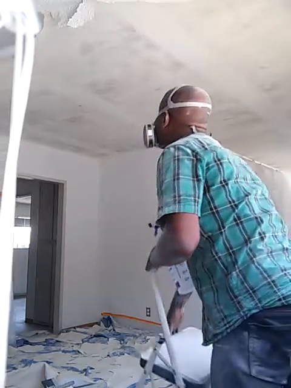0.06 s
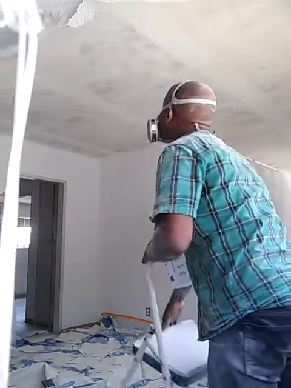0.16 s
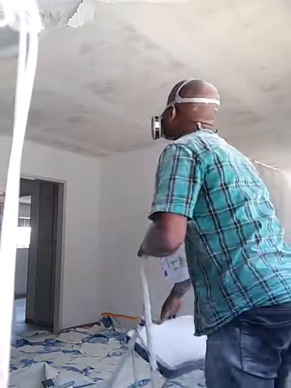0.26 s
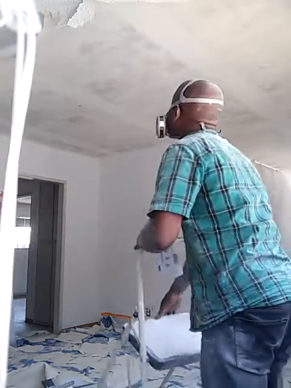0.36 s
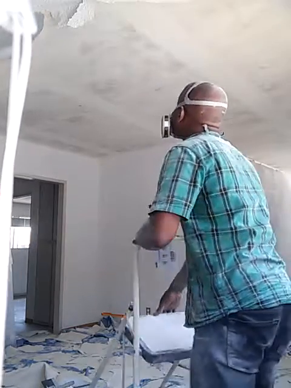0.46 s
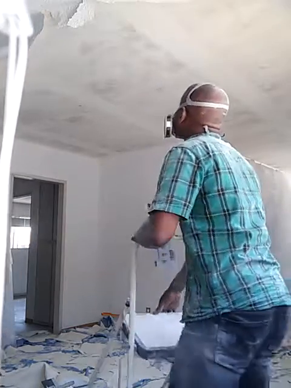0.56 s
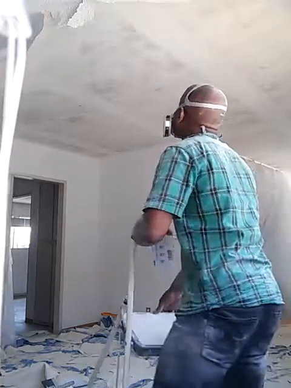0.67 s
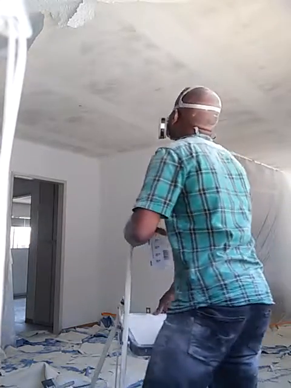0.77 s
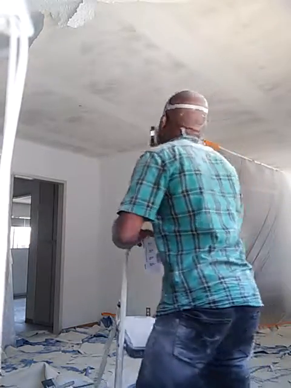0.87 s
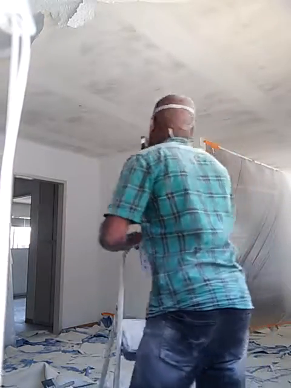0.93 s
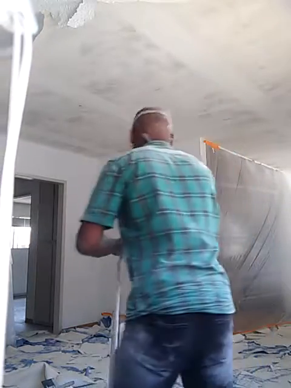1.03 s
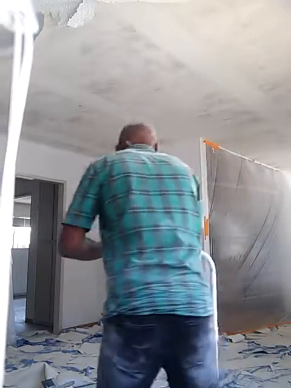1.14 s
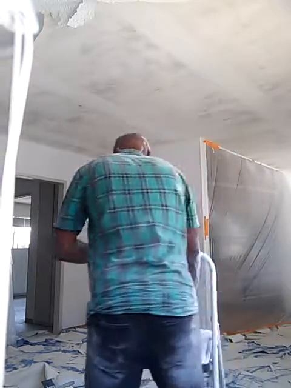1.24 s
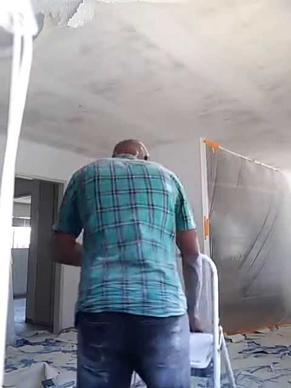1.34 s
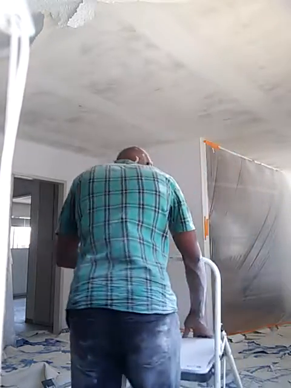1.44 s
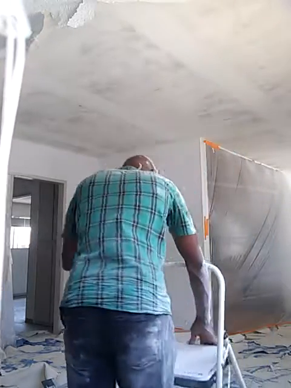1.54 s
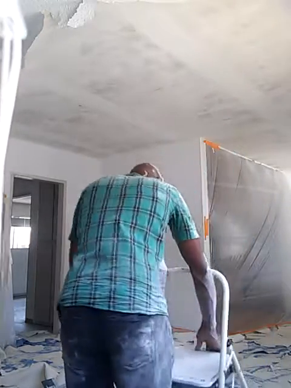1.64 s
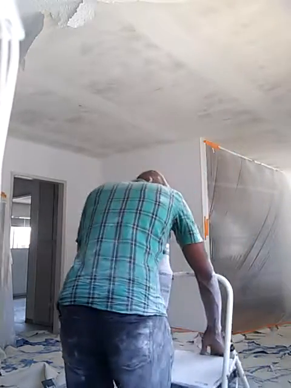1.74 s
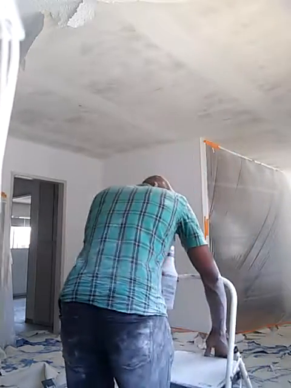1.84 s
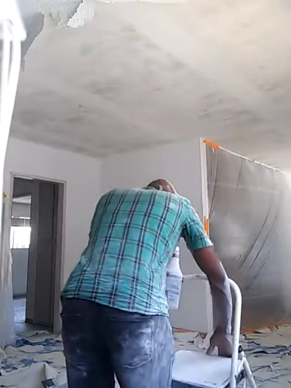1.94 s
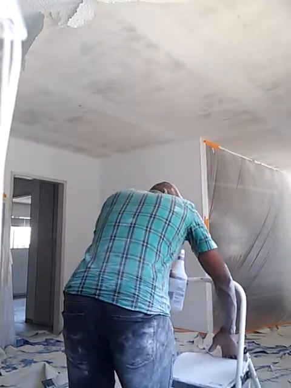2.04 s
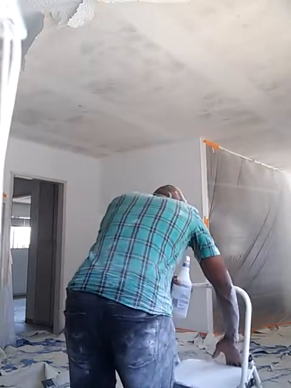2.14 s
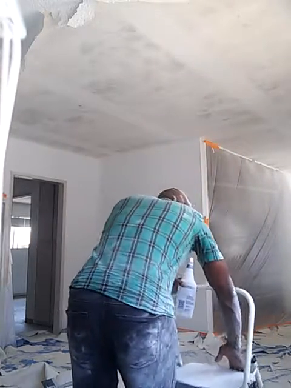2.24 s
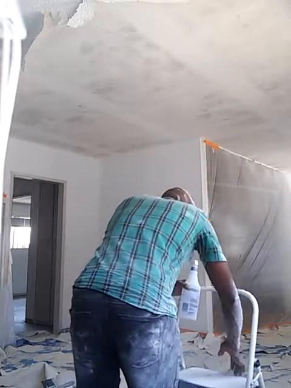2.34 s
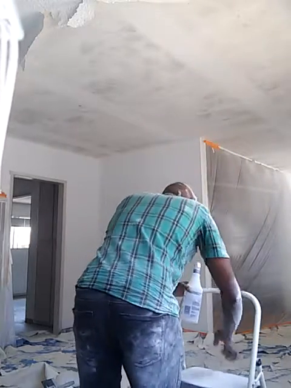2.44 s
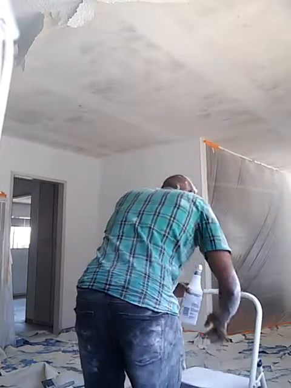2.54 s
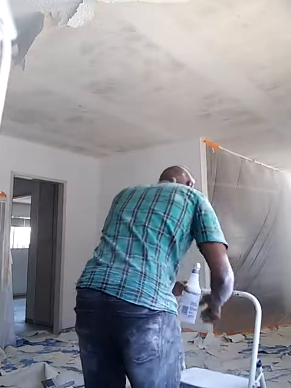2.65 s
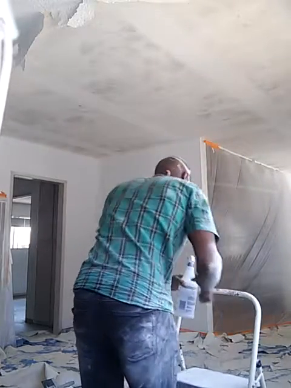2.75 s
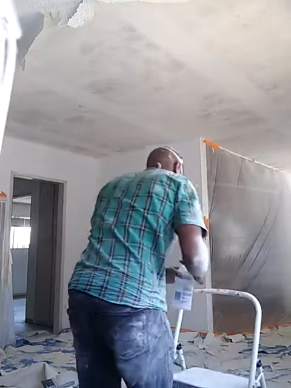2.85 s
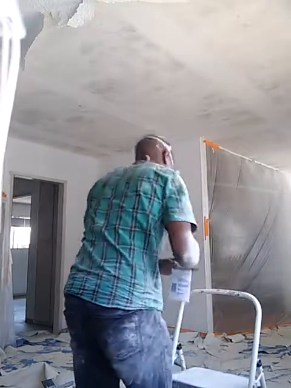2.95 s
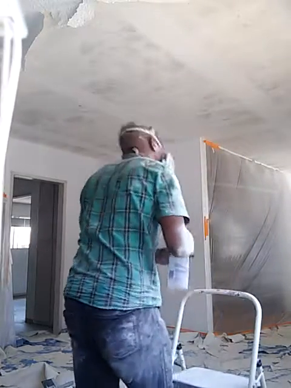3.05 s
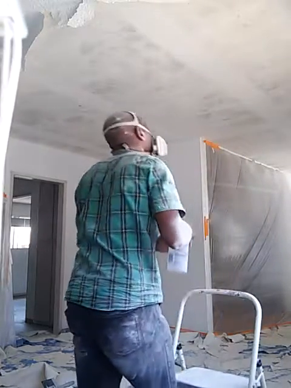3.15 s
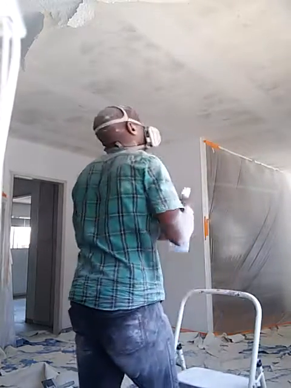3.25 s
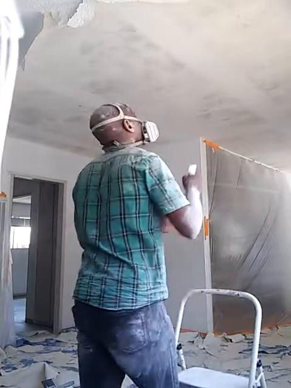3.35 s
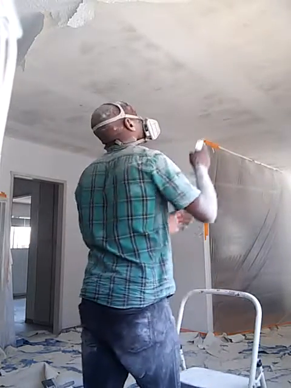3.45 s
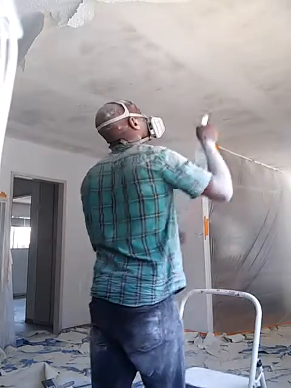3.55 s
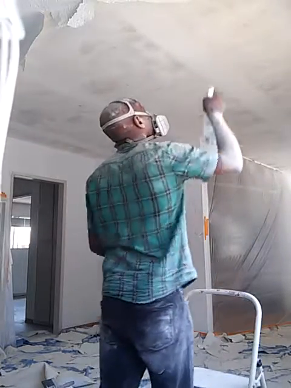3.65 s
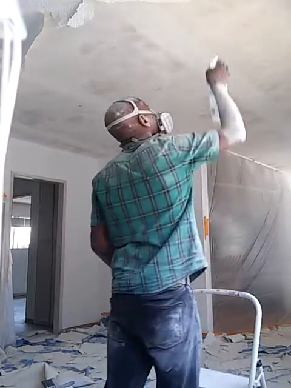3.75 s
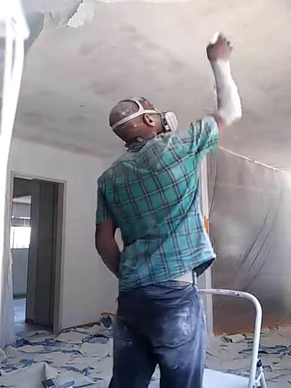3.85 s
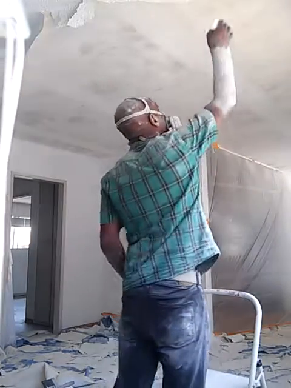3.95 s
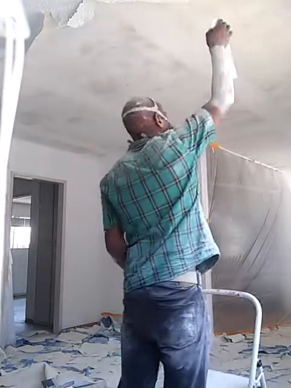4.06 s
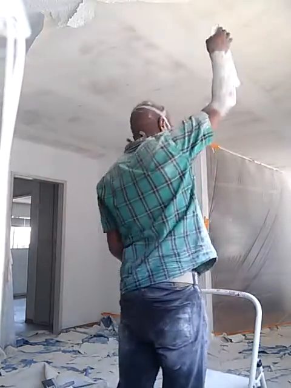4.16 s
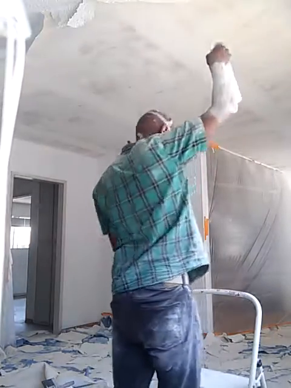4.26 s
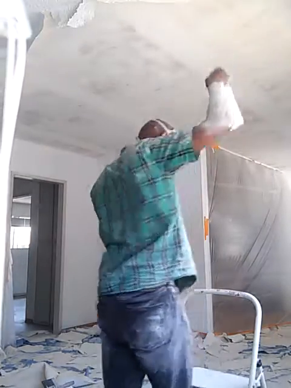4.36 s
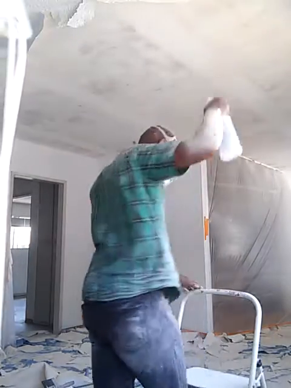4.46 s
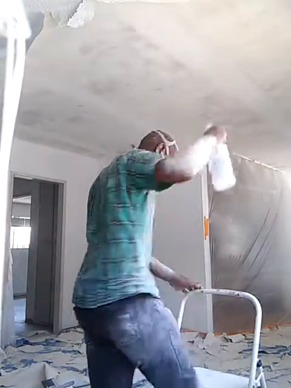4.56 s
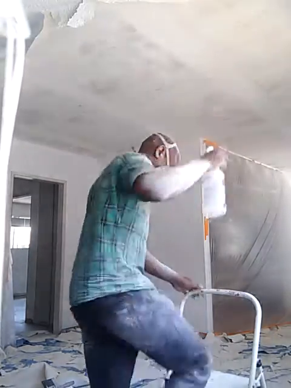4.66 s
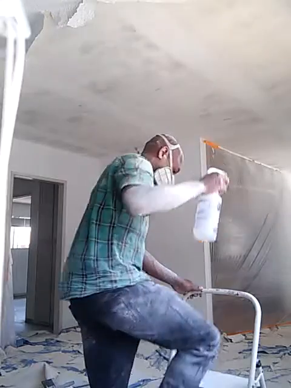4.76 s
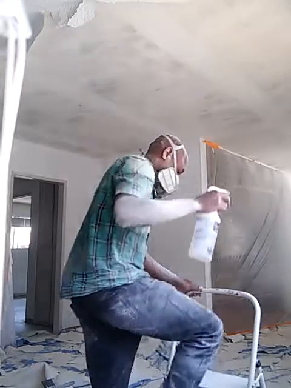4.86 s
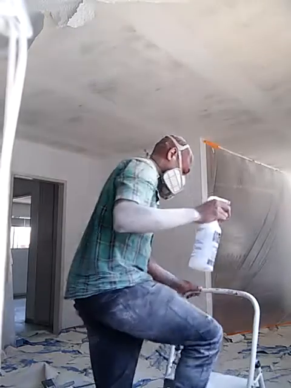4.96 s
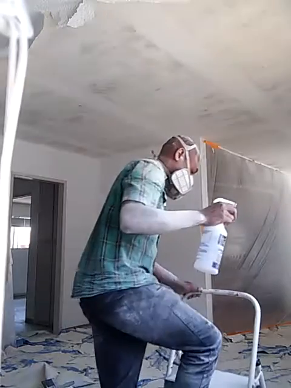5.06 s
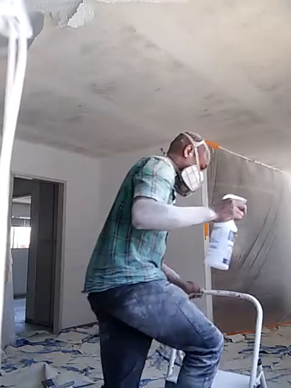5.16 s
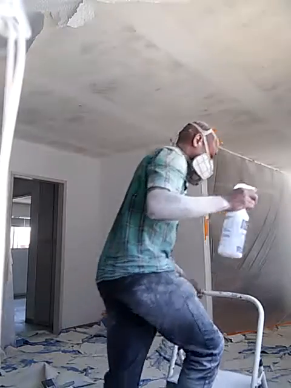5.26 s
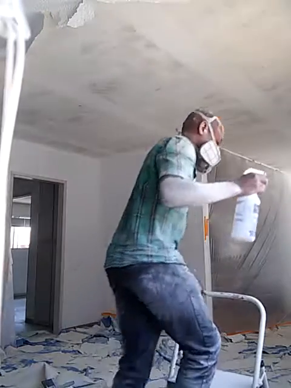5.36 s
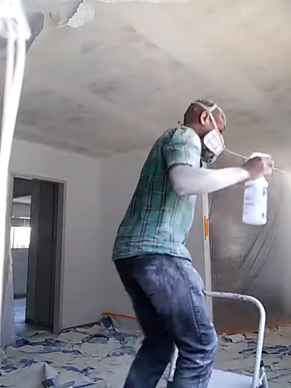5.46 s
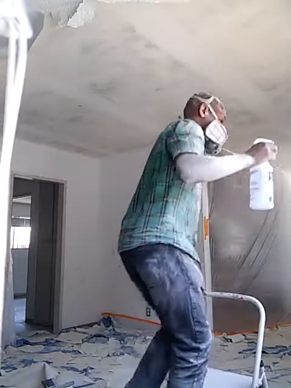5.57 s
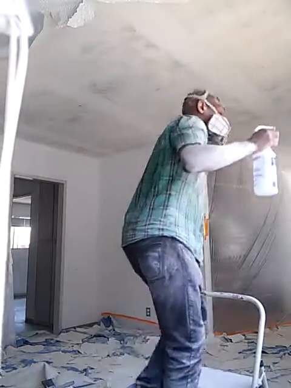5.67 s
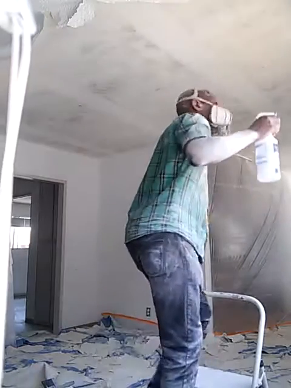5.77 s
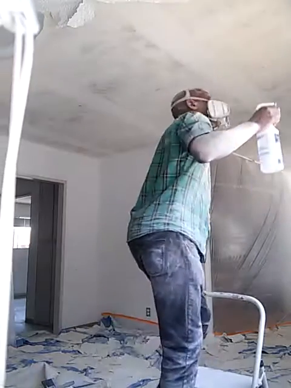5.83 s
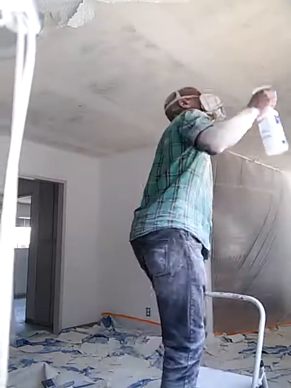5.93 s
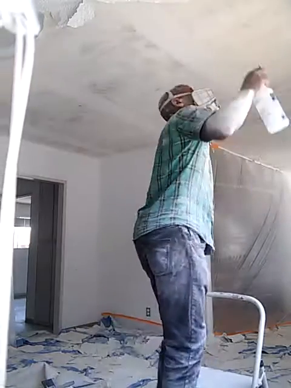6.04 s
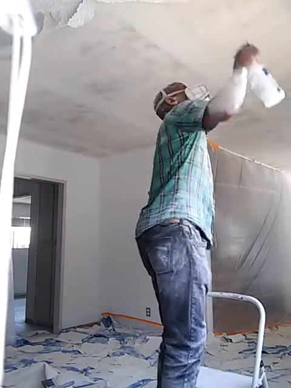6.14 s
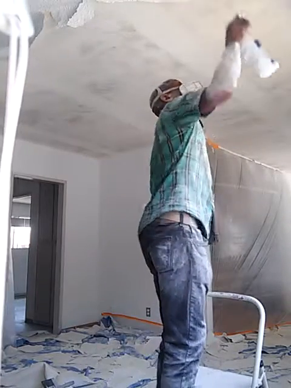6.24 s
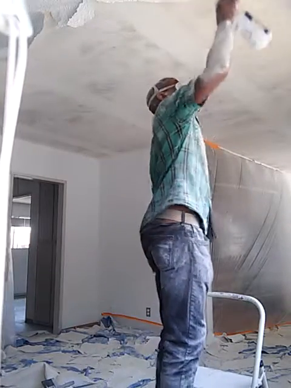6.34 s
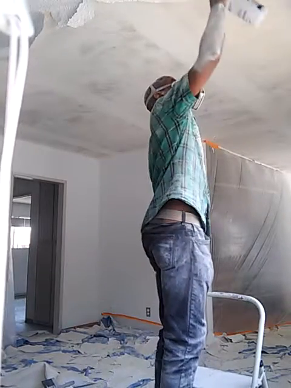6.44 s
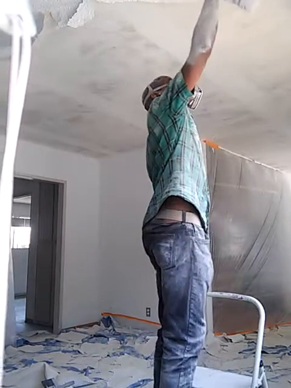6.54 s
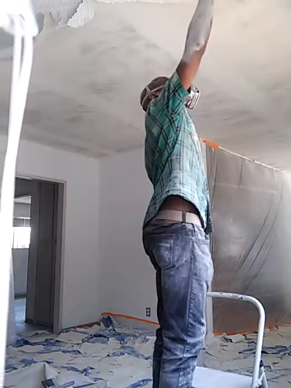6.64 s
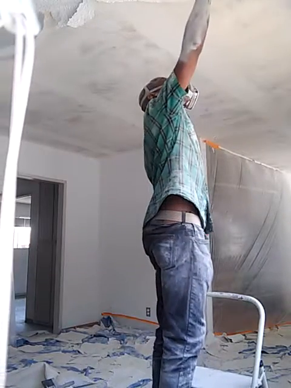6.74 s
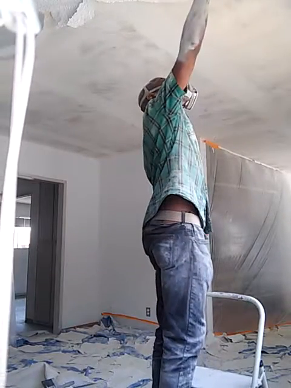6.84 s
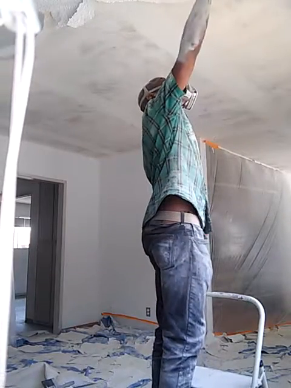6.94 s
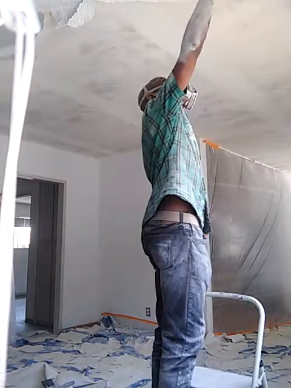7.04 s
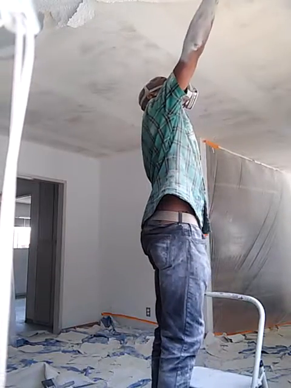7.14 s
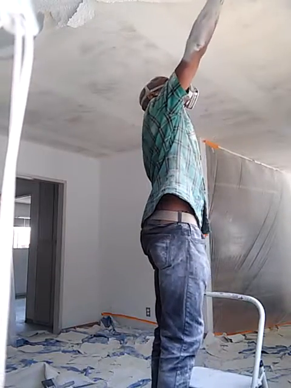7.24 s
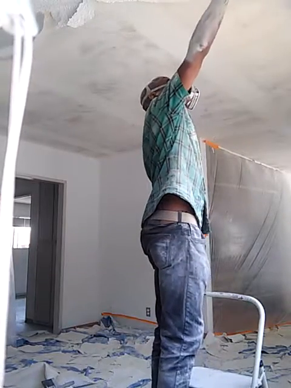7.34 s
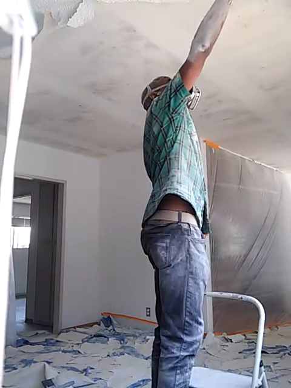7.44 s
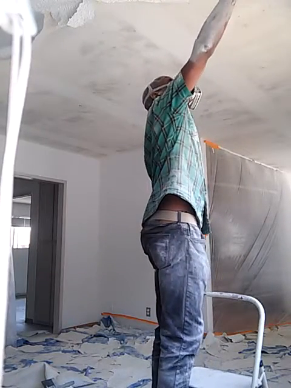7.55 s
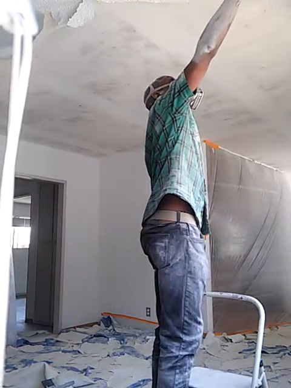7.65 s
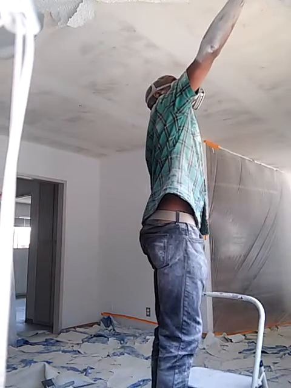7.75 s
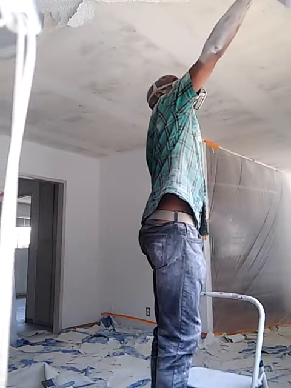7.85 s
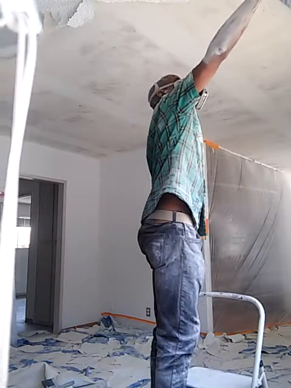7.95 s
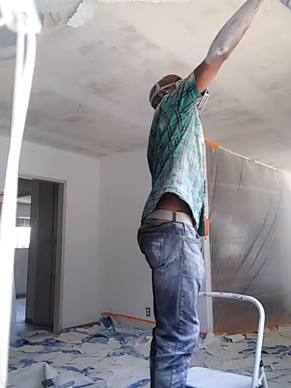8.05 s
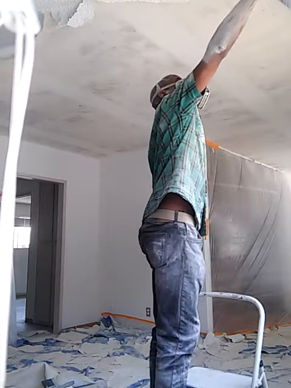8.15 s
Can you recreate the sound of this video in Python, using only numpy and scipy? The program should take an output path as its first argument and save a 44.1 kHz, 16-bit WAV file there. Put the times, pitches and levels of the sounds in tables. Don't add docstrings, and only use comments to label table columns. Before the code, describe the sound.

A bare, reverberant room with low street rumble and a distant engine drone. A metal step stool is moved with small creaks, squeaky whines and gritty shoe scuffs, then set down with a sharp double clack, loud and ringing. Plastic bottle handling and cloth rustle follow, then a foot thuds on the tread. Finally a trigger bottle is pumped overhead, clicking and hissing in short bright squirts. The microphone hears the spray fairly dry, the knocks mostly as room echo.

```python
import sys
import numpy as np
from scipy import signal
from scipy.fft import rfft, irfft
from scipy.io import wavfile

SR = 44100
rng = np.random.default_rng(int(sys.argv[2]) if len(sys.argv) > 2 else 0)


def volts(x):
    e = np.asarray(x, float) / 20
    return 10 ** e


def store_pcm(level_fs):
    pcm = np.round(np.clip(level_fs, -1, 1) * 32767).astype(np.int16)
    wavfile.write(sys.argv[1], SR, np.atleast_2d(pcm).T)


N = 361619

# (time [s], half length [s], swell [dB])
STREET_SWELLS = [(0, 0.035, 15), (0.163, .07, -10), (0.328, 0.055, 5.5), (0.855, 0.15, -9),
                 (1.22, 0.13, 10.5), (1.645, 0.11, 10.5), (1.98, 0.021, 9.5), (2.747, 0.3, 12.5),
                 (3.32, 0.16, 8), (3.753, .1, 4), (4.087, 0.12, -5.5), (4.347, 0.15, 7), (5.002, 0.27, 2),
                 (5.408, 0.16, 14.5), (5.9, 0.046, 7.5), (6.124, 0.046, -12.5), (6.301, 0.075, 1),
                 (6.467, 0.08, -9.5), (7.345, 0.15, 9), (7.816, 0.39, 2)]
# (frequency [Hz], density [dB per Hz])
RUMBLE_SPECTRUM = [(15, -68.5), (25, -54.5), (35, -31), (65, 1.5), (86, 1.5), (110, -2), (140, -46),
                   (240, -120)]
DRONE_SPECTRUM = [(56, -34), (95, -3.5), (129, 4.5), (145, 5.5), (194, -9.5), (220, -5), (264, -13),
                  (450, -20.5), (580, -43.5), (990, -120)]
WASH_SPECTRUM = [(180, -27.5), (300, -9.5), (427, -13), (540, -10), (734, -2), (825, -0.5), (980, -0.5),
                 (1730, -16), (2330, -22.5), (2600, -31), (3380, -58.5), (5720, -120)]
HISS_SPECTRUM = [(1060, -29.5), (1800, 0.5), (2480, -20), (2880, -8), (4900, -17), (6760, -9), (8990, -9.5),
                 (11600, 5), (15200, -4), (16200, -22.5)]
RUMBLE_DB, WASH_DB, HISS_DB = -62, -63.5, -64.5
WASH_FOLLOWS, WASH_GROWS_DB_PER_S = 0.51, 0.5
WASH_PATCH_DB, WASH_PATCH_PER_S = 1.8, 10.0
DRONE_FAR_DB, DRONE_NEAR_DB, DRONE_NEARS_S = -65.5, -53.5, 3.4
DRONE_SWELL_S, DRONE_SWELL_DB_PER_S = 7.7, 6
HUM_HZ, HUM_T60_S, HUM_DB = 80, 0.28, -3

# (frequency [Hz], decay time t60 [s])
ROOM_DECAY = [(100, 0.65), (400, 0.53), (1500, 0.61), (5000, 0.58), (12000, 0.4)]

# (time [s], length [s],
# peak level [dB], from [Hz], to [Hz])
WHINES = [(1.175, .1, -50, 1380, 1320), (1.32, .09, -56, 1360, 1330), (1.428, .125, -47, 1340, 1360),
          (1.205, .13, -54, 880, 960), (1.3, .075, -53, 1060, 1070), (1.44, .07, -53, 1010, 920),
          (1.5, .05, -53, 900, 880), (1.575, .06, -49, 960, 950), (1.24, .06, -56, 1480, 1660),
          (1.5, .045, -54, 1260, 1230), (2.97, .03, -47, 960, 950), (3.0, .04, -47, 990, 1030),
          (3.03, .1, -52, 1150, 1150), (3.04, .1, -52, 1420, 1400), (3.23, .1, -51, 1400, 1360),
          (3.27, .05, -50, 1050, 1040), (5.72, .05, -55, 980, 1030), (5.835, .06, -51, 930, 980),
          (5.92, .09, -50, 940, 1030), (5.88, .08, -56, 2000, 1950), (5.86, .035, -57, 1540, 1560),
          (6.18, .11, -56, 1000, 980), (6.7, .11, -61, 2500, 2540), (6.81, .1, -60, 2520, 2720),
          (6.65, .11, -55, 1320, 1400), (6.63, .06, -52, 900, 920), (1.96, .04, -53, 1010, 1000),
          (2.02, .05, -53, 1020, 1000), (7.06, .05, -49, 970, 950), (6.62, .045, -50, 4200, 4500),
          (.12, .07, -55, 960, 1020), (.73, .045, -55, 980, 970), (.46, .09, -46, 990, 960),
          (7.765, .06, -53, 900, 920), (8.06, .08, -53, 830, 880)]
WHINE_WOBBLE, WHINE_ROUGH = 0.012, 0.85

# (time [s], peak level [dB], pitch [Hz], length [s], ring t60 [s])
JOINT_CREAKS = [(.165, -56, 2110, 0.077, .03), (.252, -54, 2110, .03, .025), (.3, -58, 2090, .04, .025),
                (0.282, -46, 1740, .06, .02), (.25, -50, 1180, .06, .012), (.29, -50, 1510, 0.064, .008),
                (.32, -44, 900, .05, .02), (0.312, -47, 1290, 0.064, 0.028), (1.202, -48, 900, 0.1, 0.02),
                (1.43, -42, 1283, 0.09, 0.01), (2.1, -47.5, 1380, 0.071, .01),
                (2.13, -43.5, 1400, 0.11, .01), (2.145, -43.5, 1597, 0.044, .01),
                (2.17, -39, 1540, 0.079, 0.011)]
# (time [s], peak level [dB], pitch [Hz], length [s], ring t60 [s])
HANDLING = [(2.9, -38, 790, 0.04, 0.015), (3.057, -41.5, 772, 0.053, 0.18), (3.123, -51, 2835, 0.035, .015),
            (3.4, -39, 2050, .04, 0.005), (3.37, -39, 3980, 0.13, 0.0063), (3.46, -43, 2550, .09, .005),
            (5.8, -47, 1400, 0.16, 0.0028), (5.85, -47, 2300, 0.1, 0.0044), (2.82, -46, 1950, 0.05, .008),
            (3.507, -42, 2600, 0.042, .012), (3.539, -43, 1830, 0.042, .03), (3.63, -52, 1010, 0.23, 0.11),
            (4.611, -52.5, 2820, 0.058, 0.0098)]
# (time [s], peak level [dB], pitch [Hz], length [s], ring t60 [s])
LEVER_SQUEAKS = [(6.806, -44, 2100, .012, .008), (6.93, -45, 2450, .03, .01), (6.97, -44, 2600, .04, .01),
                 (6.93, -45, 1240, .03, .015), (7.131, -33, 4200, .012, 0.012),
                 (7.17, -48, 2600, 0.028, .01), (7.226, -27, 2180, .015, 0.0076),
                 (7.445, -36, 2170, 0.03, 0.0048), (7.445, -34, 1050, 0.046, 0.016),
                 (7.235, -37, 800, .04, .015), (7.3, -38, 900, .05, .015), (7.54, -33, 2150, .03, .006)]
# (time [s], peak level [dB], pitch [Hz], length [s], ring t60 [s])
THUMPS = [(2.233, -12, 570, 0.044, 0.013), (2.27, -23.5, 640, 0.02, 0.0064),
          (0.415, -30, 1060, 0.02, 0.019), (0.436, -24.5, 2240, 0.049, 0.00065),
          (1.034, -41, 2650, 0.052, 0.016), (2.38, -23.5, 1400, 0.0074, 0.017),
          (4.289, -31, 2200, 0.053, 0.00076), (2.433, -4.5, 1200, 0.024, 0.0033),
          (2.475, -15.5, 14050, 0.061, 0.02), (2.485, -8.5, 10850, 0.04, 0.019),
          (2.44, -15.5, 4200, 0.053, 0.0061), (5.33, -30, 780, 0.055, 0.0097),
          (5.15, -25.5, 6130, 0.093, 0.018), (2.434, -11, 448, 0.06, 0.016), (2.434, -21, 300, 0.077, 0.13),
          (2.434, -15, 393, .05, .12), (2.436, -21, 427, .05, 0.13), (2.435, -20, 487, .05, .1),
          (2.434, -24, 219, 0.042, .12), (5.15, -24, 385, 0.019, 0.064), (1.436, -41, 1700, .005, .02),
          (5.7, -39, 1400, 0.0067, 0.0068), (5.167, -24.5, 297, 0.025, 0.097),
          (5.33, -21.5, 303, 0.014, 0.038)]
# (time [s], peak level [dB], pitch [Hz], length [s], ring t60 [s])
KNOCKS = [
    (2.886, -23, 1150, .0005, .035),
    (2.886, -30, 820, .03, .03),
    (2.234, -11, 155, .0002, .3),
    (2.235, -17, 84, .0002, .6),
    (5.16, -19, 150, .02, .3),
    (5.32, -21, 140, .02, .3),
    (2.48, -17, 220, .04, .15),
]
SLIP_RISE_S = 0.005

# (time [s], rise [s], hold [s], crackle level [dB], drag against crackle [dB])
SCUFFS = [(0.0, 0.0028, 0.01, -51, -7.5), (1.017, .016, .02, -40, -20), (1.02, 0.044, 0.043, -32, -9),
          (1.253, 0.015, .01, -43, -12), (1.555, 0.028, 0.043, -41, -16), (1.578, 0.089, 0.015, -40, -5.5),
          (1.925, 0.038, 0.027, -62, -25), (2.08, 0.15, .02, -41, -28), (2.775, 0.067, 0.023, -36.5, -13.5),
          (3.07, 0.023, 0.02, -36.5, -24), (3.187, 0.079, 0.11, -43, -20), (3.243, 0.17, .01, -29, -15),
          (3.42, 0.073, 0.077, -35, -13), (3.618, 0.035, .006, -31.5, -17),
          (3.748, 0.059, 0.21, -55.5, -18), (4.05, 0.14, 0.095, -49.5, -14),
          (4.22, 0.068, 0.014, -33.5, -16), (4.295, 0.05, 0.018, -39, -0.5),
          (4.609, 0.025, 0.0055, -42, -19), (4.7, .12, .12, -49.5, -17), (5.428, 0.05, .005, -37.5, -17),
          (5.713, 0.078, 0.075, -43, -13.5), (5.8, 0.091, 0.11, -43.5, -15), (6.108, 0.11, 0.14, -51, -17),
          (6.534, 0.052, 0.019, -48.5, -12)]
# (time [s], rise [s], hold [s], level [dB])
BRUSHES = [
    (4.46, 0.14, .1, -48),
    (5.8, 0.022, 0.025, -49.5),
    (4.67, 0.084, 0.15, -46.5),
    (3.85, 0.095, 0.23, -58),
    (5.6, 0.039, 0.043, -58),
    (3.0, 0.069, 0.054, -52),
    (0.54, 0.043, 0.064, -48),
]
# (frequency [Hz], density [dB per Hz])
CRACKLE_SPECTRUM = [(2060, -39), (3500, -31.5), (4080, -12.5), (4850, -13), (5480, -8.5), (8370, -10.5),
                    (9160, -9.5), (11500, 3.5), (15200, -6.5), (16200, -17)]
SCUFF_RISE_DB, SCUFF_FALL_DB_PER_S = 22, 129
CLOTH_DB, CLOTH_FROM_S = -60, 1.05
BRUSH_FROM_HZ = 7200

# (time [s], peak level [dB])
TICKS = [(0.0228, -39), (0.0558, -38), (4.6388, -23), (6.6403, -16), (6.6454, -13), (6.6615, -12),
         (6.9277, -19), (6.9374, -19), (6.9601, -18), (6.9774, -10), (6.9824, -18), (7.0914, -30),
         (7.1731, -31), (7.22, -19), (7.2304, -16), (7.2444, -19), (7.5244, -16), (7.5313, -15),
         (7.5424, -12), (7.5462, -9), (7.8565, -32), (7.8845, -16), (7.8944, -18), (8.1144, -28)]
# (time [s], peak
# level [dB], pitch [Hz])
SNAPS = [(.021, -46, 3900), (.03, -45, 4300), (.041, -45, 3830), (.058, -51, 4100), (.075, -52, 3900),
         (5.101, -48, 2200), (6.6207, -24, 9000), (7.1733, -33, 7500), (7.2056, -22, 12000),
         (7.5171, -22, 12000), (7.8696, -20, 11500), (6.8082, -25, 12000), (6.9601, -22, 12000),
         (1.2675, -32.5, 11500), (4.2861, -25, 11000), (4.294, -29, 8980), (4.463, -33, 7260),
         (4.6404, -18, 12300), (2.886, -24.5, 1030), (2.8865, -30, 816), (2.888, -30.5, 1590),
         (2.4347, -8, 10500), (2.4993, -5, 11500), (7.734, -38, 7000), (5.1602, 0, 11400),
         (5.186, 3, 11300), (6.662, -18.5, 5560), (6.811, -25, 7060), (6.816, -28, 8600),
         (6.9165, -26, 7000), (6.962, -27, 5500), (6.978, -21, 6300), (7.079, -39, 3600),
         (7.092, -27, 6800), (7.2064, -22, 6900), (7.2205, -23, 6500), (7.2298, -33, 2090),
         (7.4463, -33, 2060), (7.517, -27, 6300), (7.546, -13, 7400), (7.546, -20, 5270),
         (7.5645, -28, 4970), (7.8698, -26, 5120), (7.8838, -29, 5700), (8.114, -29, 6120),
         (6.9575, -20, 10500), (1.437, -39.5, 1340), (5.101, -35, 1200), (6.245, -52, 2250)]
SNAP_CYCLES = 23
SPIT_HZ = 11760, 15700
CATCH_DB, RETURN_DB = -18.5, -24
RETURN_S, FULL_STROKE_S = 0.208, 0.1

# (time [s], first mist [dB], squeeze [s], full mist [dB], jet against mist [dB])
STROKES = [
    (6.6208, -28, 0.032, -24.5, -17.5),
    (6.808, -28, 0.0056, -31.5, -12.5),
    (6.9147, -28.5, 0.11, -30.5, -10),
    (7.2055, -40.5, 0.12, -27, -3.5),
    (7.5167, -36, 0.13, -25.5, -5.5),
    (7.8697, -35.5, 0.11, -26, -4),
    (8.1914, -36, .03, -29, -24),
]
# (frequency [Hz], density [dB per Hz])
MIST_SPECTRUM = [(2350, -72), (4000, -27), (4340, -27), (5110, -7.5), (6460, -3), (8070, -1.5), (9680, -3),
                 (11300, 9.5), (15000, 4.5), (16200, -8)]
SWELL_BEND, JET_LAG_DB = 0.54, 3.5
BUILD_SHARE = 0.72
SHUT_DB_PER_S, DRIBBLE_DB, DRIBBLE_DB_PER_S, JET_LINGERS = 400, -5, 137, 0.99
SPUTTER_DB, SPUTTER_S = 1, 0.1
JET_FROM_HZ = 2000
JET_GRAIN = 1.3

# (time [s], peak level [dB], chatter [s], thud [dB], ring [dB])
BLOWS = [(0.416, -38.5, 0.048, 21, -30), (0.432, -20.5, 0.1, -3.5, -26), (2.212, -20, 0.067, -6, -25),
         (2.233, -7.5, 0.018, -2.5, -25), (2.25, -9.5, 0.082, -15, 1), (2.432, 4.5, 0.087, -4, 2.5),
         (5.098, -45, 0.035, 16, -28), (5.11, -30.5, 0.041, 9, -18), (5.121, -28.5, 0.025, 11, -3),
         (5.143, -18.5, 0.014, 5, 11), (5.15, -11, 0.022, 3, -5), (5.159, -17, 0.022, 5.5, 14),
         (5.179, -7.5, 0.03, -6, -33), (5.304, -19, 0.023, 7.5, -25), (5.32, -12.5, 0.037, 3.5, -12)]
# (frequency [Hz], density [dB per Hz])
CLACK_SPECTRUM = [(900, -6.5), (1500, -7), (3900, -13), (4900, -14), (8300, -14), (9900, -11), (11200, -1),
                  (13200, -8.5), (15500, -15.5), (16200, -16.5)]
# (frequency [Hz], density [dB per Hz])
THUD_SPECTRUM = [(59, -65.5), (100, 1.5), (188, -6), (221, -7), (320, -12.5), (390, -4), (497, -5.5),
                 (538, -7.5), (1010, -3.5), (2500, -17), (3250, -20.5), (5500, -120)]
# (frequency [Hz], struck at the feet [dB], struck at the tread [dB], t60 [s])
TUBE_MODES = [(1997, -16, -20, .2), (3830, -15, -20, .15), (5850, 3, 3, .008), (6120, 6, 9, .007),
              (6150, -15, -16, .04), (6420, 3, 4, .008), (10700, -1, -10, .04), (10800, -12, -20, .06),
              (11400, -6, -8, .03), (12100, -6, -9, .03), (14000, -5, -16, .035), (14070, -18, -24, .07)]
THUD_HZ, THUD_OCTAVES_PER_DB = 506, 0.045
STEPS_UP_S = 4


def rms_one(x):
    return x / np.sqrt(np.mean(x ** 2) + 1e-20)


def at_hz(points, hz):
    return np.interp(np.log(hz), np.log(np.array(points)[:, 0]), np.array(points)[:, 1])


def coloured(x, spectrum):
    hz = np.maximum(np.arange(4097) * SR / 8192, 1)
    octaves_outside = np.log2(np.maximum(np.maximum(spectrum[0][0] / hz, hz / spectrum[-1][0]), 1))
    cepstrum = irfft(np.log(volts(at_hz(spectrum, hz) - 24 * octaves_outside) + 1e-6))
    cepstrum[1:4096] *= 2
    cepstrum[4097:] = 0
    taps = irfft(np.exp(rfft(cepstrum)))
    return signal.oaconvolve(x, taps / np.sqrt(np.sum(taps ** 2)))[:N]


def highpass(x, hz, order=2):
    return signal.sosfilt(signal.butter(order, hz, "high", fs=SR, output="sos"), x)


def lowpass(x, hz):
    return signal.sosfilt(signal.butter(2, hz, fs=SR, output="sos"), x)


def band(x, low_hz, high_hz):
    passed = signal.sosfilt(signal.butter(2, [low_hz, high_hz], "band", fs=SR, output="sos"), x)
    return passed * np.sqrt(SR / 2 / (high_hz - low_hz))


def drift(rate):
    r = np.exp(-80 * np.pi * rate / SR)
    slow = signal.lfilter([1], [1, -2 * r, r * r], rng.standard_normal(N // 40 + 2002))[2000:]
    return np.interp(np.arange(N) / 40, np.arange(len(slow)), rms_one(slow))


def grains(per_s, spread_db):
    sizes = volts(spread_db * np.minimum(rng.exponential(1, N), 5)) * rng.choice([-1, 1], N)
    return rms_one(sizes * (rng.random(N) < per_s / SR))


def ring(x, hz, t60):
    r, w = volts(-60 / (t60 * SR)), 2 * np.pi * hz / SR
    return signal.lfilter([0, np.sin(w)], [1, -2 * r * np.cos(w), r * r], x + 1e-18)


def outdoors():
    t = np.arange(N) / SR
    load_db = sum(swell_db * np.exp(-((t - s) / half_s) ** 2) for s, half_s, swell_db in STREET_SWELLS)
    rumble_db = RUMBLE_DB + load_db
    distance = np.clip(1 - t / DRONE_NEARS_S, 0, 1)
    drone_db = DRONE_NEAR_DB + (DRONE_FAR_DB - DRONE_NEAR_DB) * distance
    drone_db = drone_db + DRONE_SWELL_DB_PER_S * np.maximum(t - DRONE_SWELL_S, 0)
    wash_db = WASH_DB + WASH_GROWS_DB_PER_S * (t - t.mean()) + WASH_FOLLOWS * (load_db - load_db.mean())

    rumble, drone, wash, steady = rng.standard_normal((4, N))
    edges = 170 * 1.22 ** np.arange(15)
    patches = np.zeros(N)
    for k, (low, high) in enumerate(zip(edges, edges[1:])):
        patch = volts(WASH_PATCH_DB * drift(WASH_PATCH_PER_S)) * np.sqrt(high) * band(wash, low, high)
        patches += patch * (-1) ** k
    out = np.zeros(N)
    for noise, level_db, spectrum in ((rumble, rumble_db, RUMBLE_SPECTRUM),
                                      (drone, drone_db, DRONE_SPECTRUM),
                                      (rms_one(patches), wash_db, WASH_SPECTRUM)):
        out += volts(level_db + 1.2 * drift(15) + 1.5 * drift(3)) * coloured(noise, spectrum)
    out += volts(rumble_db + HUM_DB) * rms_one(ring(steady, HUM_HZ, HUM_T60_S))
    return out + volts(HISS_DB) * coloured(steady, HISS_SPECTRUM)


def room(x, count):
    hz, s, cells = signal.stft(rng.standard_normal((count, SR)), SR, nperseg=256)
    t60 = at_hz(ROOM_DECAY, np.maximum(hz, 1))[:, None]
    tails = signal.istft(cells * volts(-60 * s / t60), SR, nperseg=256)[1][:, :SR]
    tails = tails * np.clip((np.arange(SR) / SR - 0.004) / 0.011, 0, 1)
    place = np.arange(N) * count // N
    out = np.zeros(N)
    for k, tail in enumerate(tails):
        out += signal.oaconvolve(x * (place == k), tail / np.sqrt(np.sum(tail ** 2)))[:N]
    return out


def whines():
    t, out = np.arange(N) / SR, np.zeros(N)
    slips = rng.standard_normal(N)
    waver, flutter = rms_one(lowpass(slips, 25.0)), rms_one(lowpass(slips[::-1], 45.0))
    for s, length_s, peak_db, from_hz, to_hz in WHINES:
        at = slice(round(s * SR), round((s + length_s) * SR))
        part = np.clip((t[at] - s) / length_s, 0, 1)
        hz = (from_hz + (to_hz - from_hz) * part) * (1 + WHINE_WOBBLE * np.tanh(waver[at]))
        tone = np.sin(2 * np.pi * np.cumsum(hz) / SR)
        roughness = 1 + WHINE_ROUGH * np.clip(flutter[at], -2, 2)
        out[at] += volts(peak_db) * roughness * np.sqrt(np.sin(np.pi * part)) * tone
    return out


def creaks():
    t, out = np.arange(SR * 2 // 5) / SR, np.zeros(N)
    slips = grains(per_s=3000, spread_db=4.0)
    struck_rows, eased_rows = THUMPS + KNOCKS, JOINT_CREAKS + HANDLING + LEVER_SQUEAKS
    for rows, struck in ((struck_rows, True), (eased_rows, False)):
        for s, peak_db, hz, length_s, t60 in rows:
            at = slice(round(s * SR), round(s * SR) + len(t))
            force = np.exp(-(t / length_s) ** 2) * slips[at]
            if struck:
                force[0] = 12.0
            else:
                force = force * np.clip(t / min(SLIP_RISE_S, length_s / 2), 0, 1)
                force[0] = 0
                force = lowpass(force, 2.2 * hz)
            force = highpass(force, hz / 1.6)
            out[at] += volts(peak_db - 42) / np.sqrt(t60) * ring(force, hz, t60)
    return highpass(out, 65.0)


def scuffs():
    t = np.arange(N) / SR
    power = volts(2 * CLOTH_DB) * (t > CLOTH_FROM_S) * volts([[0], [-26], [-99]])
    rows = [(*row[:4], [[0], [row[4]], [-99]]) for row in SCUFFS]
    rows += [(*row, [[-99], [-99], [0]]) for row in BRUSHES]
    for s, rise_s, hold_s, peak_db, mix_db in rows:
        level_db = peak_db - SCUFF_RISE_DB * np.clip(1 - (t - s) / rise_s, 0, 2)
        level_db -= SCUFF_FALL_DB_PER_S * np.maximum(t - s - rise_s - hold_s, 0)
        near = slice(max(round((s - rise_s) * SR), 0), round((s + 1) * SR))
        power[:, near] += volts(2 * (level_db[near] + np.array(mix_db)))
    crackle, drag, brush = np.sqrt(power)
    grit = coloured(grains(per_s=6100, spread_db=0.5) * volts(0.66 * drift(25)), CRACKLE_SPECTRUM)
    sleeve = highpass(grit, BRUSH_FROM_HZ)
    sole = band(grains(per_s=5000, spread_db=-3.0), low_hz=1386, high_hz=3350)
    return crackle * grit + brush * sleeve + drag * sole


def ticks():
    out, t = np.zeros(N), np.arange(400) / SR
    catches = [(s, CATCH_DB) for s, *_ in STROKES]
    returns = [(s + RETURN_S, RETURN_DB) for s, _, squeeze_s, *_ in STROKES if squeeze_s > FULL_STROKE_S]
    rows = TICKS + catches + returns
    spits = rng.standard_normal((len(rows), 400)) * (t / 0.0006) * np.exp(-t / 0.0006)
    for (s, peak_db), spit, hz in zip(rows, spits, rng.uniform(*SPIT_HZ, len(rows))):
        spit = band(spit, low_hz=hz / 1.13, high_hz=min(hz * 2.0, 0.45 * SR))
        at = round(s * SR)
        out[at:at + 400] += (volts(peak_db + 3.5) * spit / np.abs(spit).max())[:N - at]
    return out


def snaps():
    out, t = np.zeros(N), np.arange(400) / SR
    for s, peak_db, hz in SNAPS:
        at = round(s * SR)
        decay = volts(-60 * t * hz / SNAP_CYCLES) * np.clip(t * hz, 0, 1)
        out[at:at + 400] += volts(peak_db) * np.sin(2 * np.pi * hz * t) * decay
    return out


def spray():
    t, mist, jet, sputter = np.arange(N) / SR, np.zeros(N), np.zeros(N), drift(120)
    for s, start_db, squeeze_s, peak_db, jet_db in STROKES:
        pressure = np.clip((t - s) / (squeeze_s * BUILD_SHARE), 0, 1) ** SWELL_BEND
        after = np.maximum(t - s - squeeze_s, 0)
        flow = np.clip((t - s) / 0.00077, 0, 1) * volts(start_db + (peak_db - start_db) * pressure)
        trapped_air = np.exp(-(np.maximum(t - s, 0) / SPUTTER_S) ** 2)
        flow = flow * volts(SPUTTER_DB * trapped_air * (sputter - 1.5))
        shutting = (1 - volts(DRIBBLE_DB)) * volts(-SHUT_DB_PER_S * after)
        dying = shutting + volts(DRIBBLE_DB - DRIBBLE_DB_PER_S * after)
        mist = np.maximum(mist, flow * dying)
        jet_gain = volts(jet_db - JET_LAG_DB * (1.5 - pressure ** 2.0))
        jet = np.maximum(jet, flow * dying ** JET_LINGERS * jet_gain)
    droplets = grains(per_s=24000, spread_db=1.6) * volts(0.7 * drift(60))
    stream = rng.standard_normal(N)
    stream = rms_one(np.sign(stream) * np.abs(stream) ** JET_GRAIN)
    stream = band(highpass(stream, JET_FROM_HZ, order=3), low_hz=1420, high_hz=6300)
    return mist * coloured(droplets, MIST_SPECTRUM) + jet * stream * volts(0.93 * drift(38))


def stool():
    t, force = np.arange(SR // 4) / SR, np.zeros((3, N))
    contacts = grains(per_s=9000, spread_db=2.0)
    for s, peak_db, chatter_s, thud_db, ring_db in BLOWS:
        at = slice(round(s * SR), round(s * SR) + len(t))
        envelope = np.clip(t / 0.00038, 0, 1) * np.exp(-(t / chatter_s) ** 4)
        touch = contacts[at] * envelope * volts(peak_db - 15)
        thud_hz = THUD_HZ * 2 ** (-THUD_OCTAVES_PER_DB * peak_db)
        thud = band(touch, low_hz=thud_hz / 2.3, high_hz=thud_hz * 1.56) * volts(-17.0) + touch * volts(-8.0)
        thud = highpass(thud, thud_hz / 2.86)
        strike = touch * rng.choice([-1, 1], len(t))
        force[:, at] += [touch, volts(thud_db) * thud, volts(ring_db) * strike]
    on_tread = np.arange(N) > STEPS_UP_S * SR
    tubes = np.zeros(N)
    for hz, feet_db, tread_db, t60 in TUBE_MODES:
        tubes += ring(force[2] * volts(np.where(on_tread, tread_db, feet_db) - 33.0), hz, t60)
    return coloured(force[0], CLACK_SPECTRUM) + coloured(force[1], THUD_SPECTRUM) + tubes


def scene():
    street, tones, joints, feet = outdoors(), whines(), creaks(), scuffs()
    bottle, blows = ticks() + snaps() + spray(), stool()
    sent = volts(-8) * tones + volts(-1.0) * joints + volts(-17.5) * feet + volts(-11.0) * bottle + volts(-4.5) * blows
    direct = tones + joints + volts(-4.0) * feet + bottle + volts(-2.0) * blows
    return (street + direct + room(sent, count=9))[None]


def band_limit(x):
    return signal.sosfilt(signal.butter(12, 16820, fs=SR, output="sos"), x)


def record(dry):
    rounded = 1.2 * np.tanh(dry / 1.2)
    cut = signal.sosfilt(signal.cheby2(14, 42, 16280, fs=SR, output="sos"), rounded)
    return band_limit(np.clip(cut, -1, 1))


dry = scene()
out = record(dry)
store_pcm(out)
```